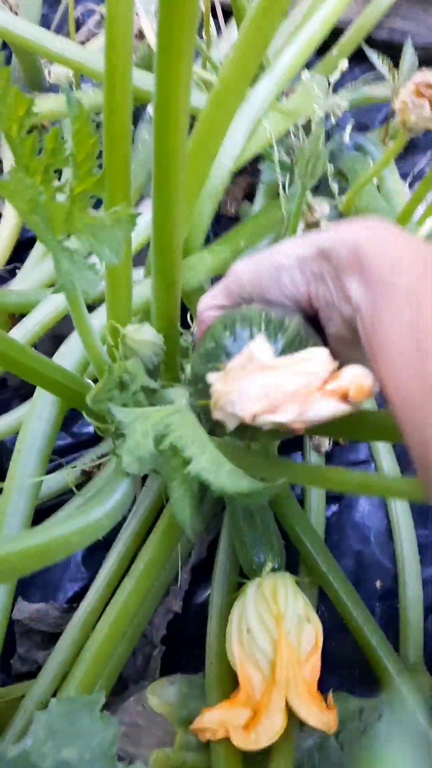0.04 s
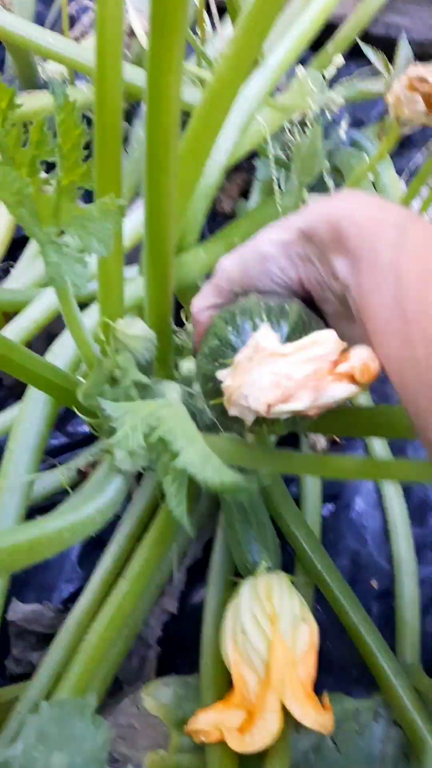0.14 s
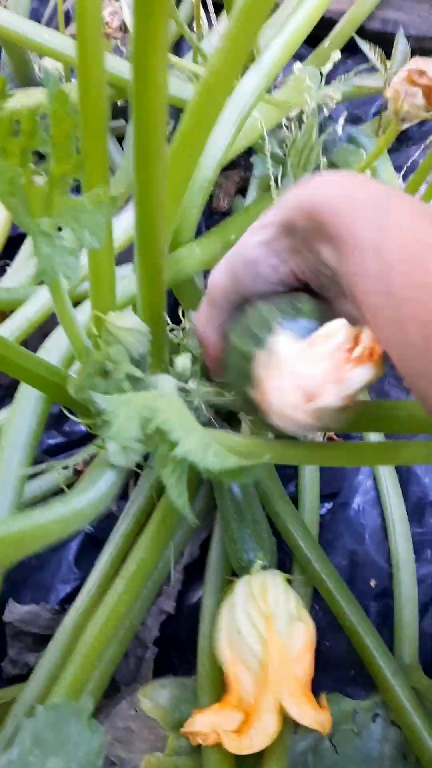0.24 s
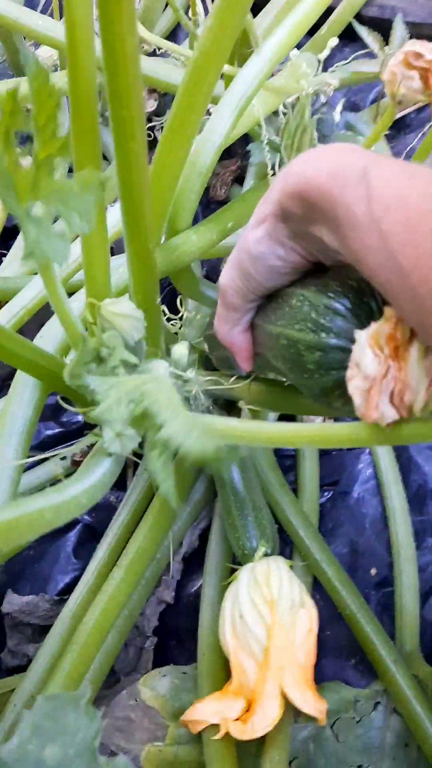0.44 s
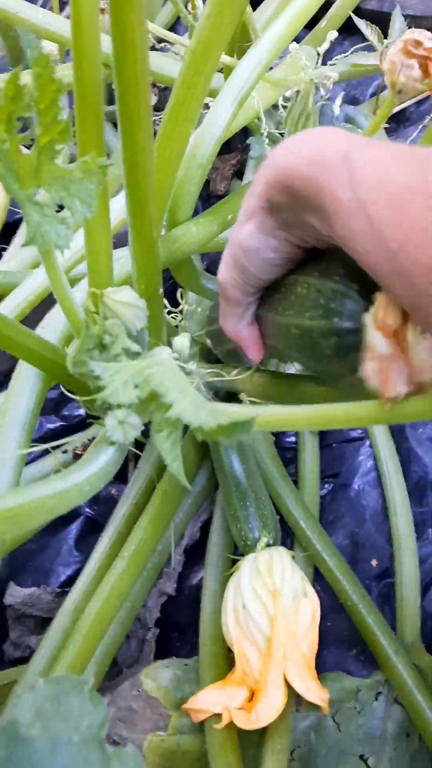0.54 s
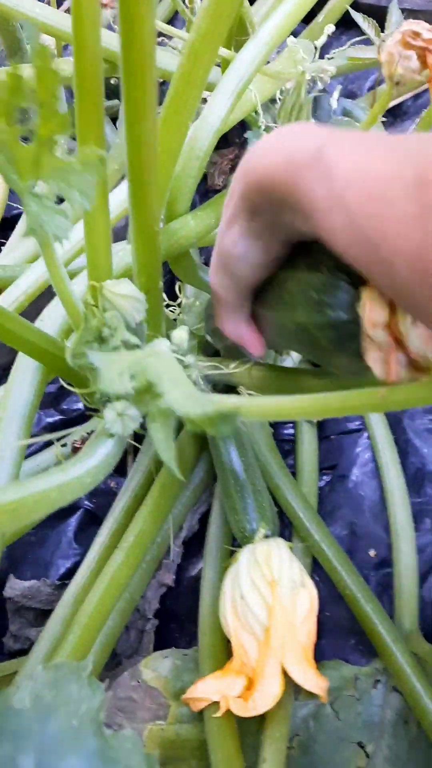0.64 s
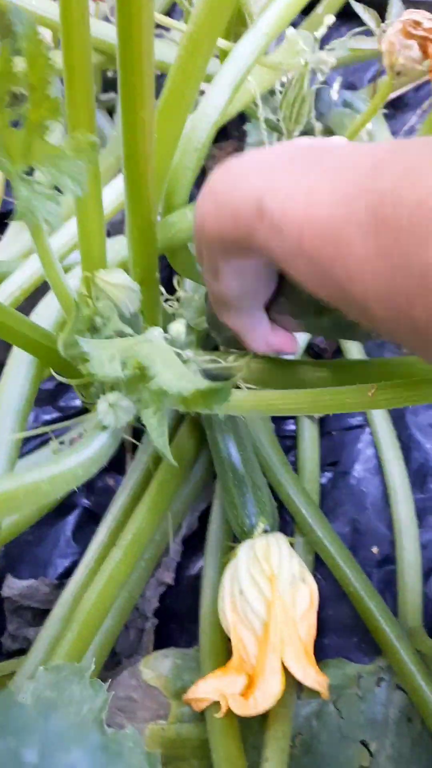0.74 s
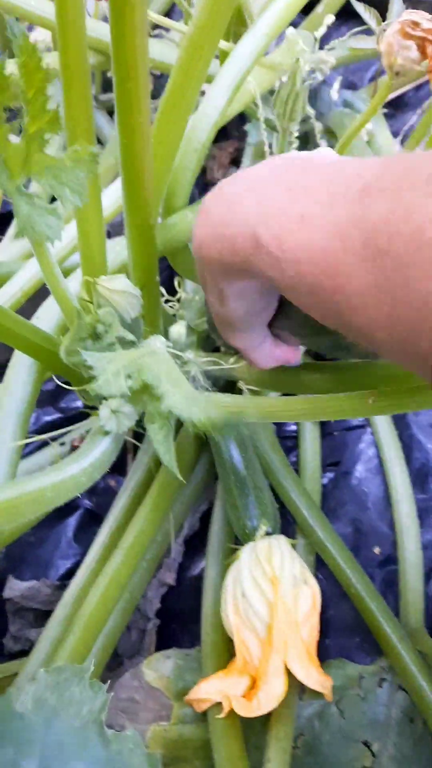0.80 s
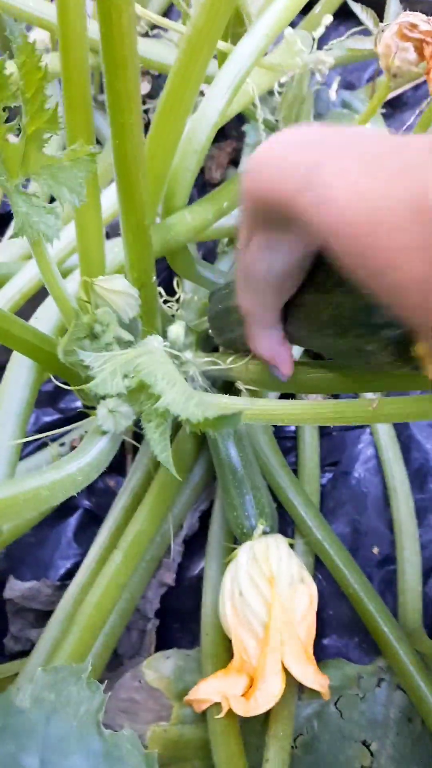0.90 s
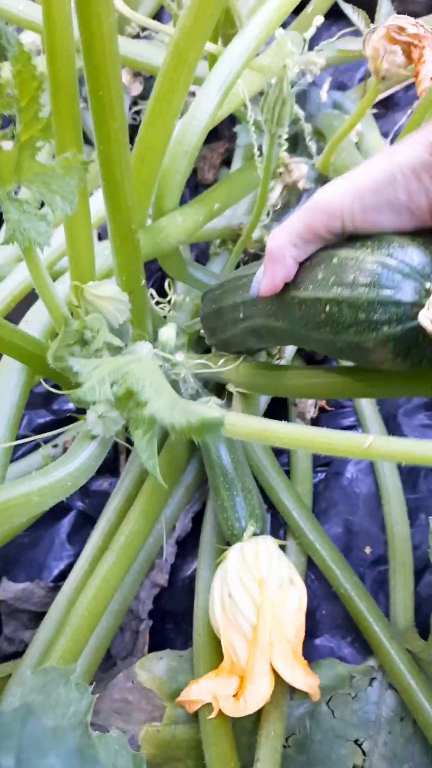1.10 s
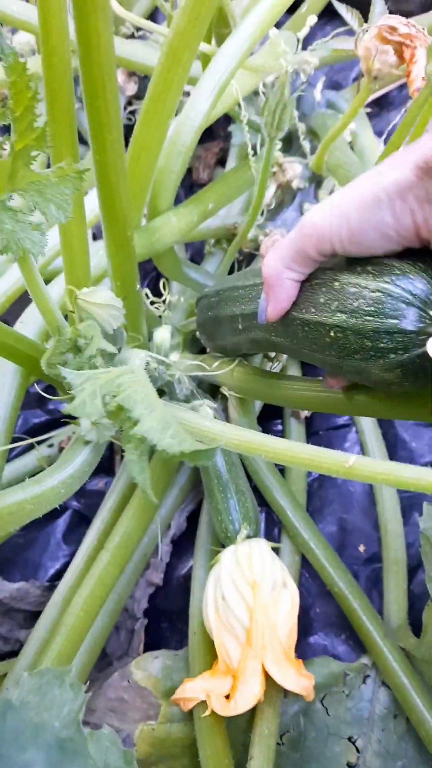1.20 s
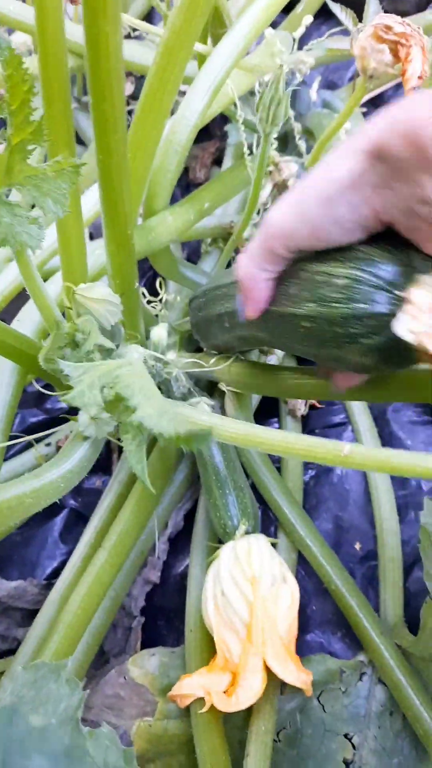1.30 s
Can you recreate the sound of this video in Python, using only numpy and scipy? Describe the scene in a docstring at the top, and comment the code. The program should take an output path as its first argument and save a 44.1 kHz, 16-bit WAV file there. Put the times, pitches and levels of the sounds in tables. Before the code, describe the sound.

A courgette stalk snaps with a juicy crack, creaks in jerks, then squeaks and slows into clicks as it is twisted off; bristly leaves rustle and tick around it, close microphone, quiet greenhouse.

```python
"""A courgette is twisted off its plant by hand, close up, in a greenhouse.
First, bristly leaves tick and rustle by random friction, the fruit is softly bumped and the plant rumbles.
At 0.22 s fibres tear as noise bursts; the juicy stalk snaps, then creaks in stick-slip jerks whose force
pulses excite the modes of the firm fruit. From 0.63 s a long twist squeaks and slows into single slips.
Leaves go on flicking and sliding, and a few faint slips come last, over still air and a short room tail."""
import sys
import numpy as np
from scipy import signal
from scipy.fft import rfft, irfft, next_fast_len
from scipy.io import wavfile

SR = 44100
rng = np.random.default_rng(int(sys.argv[2]) if len(sys.argv) > 2 else 0)


def to_wav(s):
    """Save 16-bit WAV."""
    ch = np.atleast_2d(s).T  # columns
    pcm = np.round(np.clip(ch, -1, 1) * 32767)  # PCM
    wavfile.write(sys.argv[1], SR, pcm.astype(np.int16))


N = 59535
TIME = np.arange(N) / SR

# strength of the leaves brushing the hand: time_s, level_db
BRUSH_LEVEL = [(0, -55), (.07, -61.5), (.15, -54.5), (.21, -53.5), (.25, -41), (.31, -45.5), (.37, -53),
               (.46, -61), (.54, -45.5), (.61, -69.5), (.72, -53), (.82, -61.5), (.95, -62.5),
               (1.07, -62.5), (1.13, -55), (1.20, -54.5), (1.25, -61), (1.35, -57)]
# spectrum of leaf friction and flicks: frequency_hz, gain_db
LEAF_SPECTRUM = [(300, -2.5), (1000, 0), (1300, 0.5), (1750, -1.5), (2300, -1.5), (3000, 1), (4500, 0),
                 (6000, 0), (7800, -1.5), (9300, -6.5), (12000, 0.5), (16000, -3.5)]
LEAF_PLACE = (5.2, 0.067)  # every place: left minus right in dB, left-right likeness


def from_db(db):
    """Amplitude ratio: 20 dB is a factor of ten."""
    return 10 ** (np.asarray(db) / 20)


def rms_one(x):
    """Normalisation to a root mean square of 1."""
    return x / np.sqrt(np.mean(x ** 2) + 1e-20)


def level(curve):
    """Amplitude envelope: gain over time, interpolated in dB between (time_s, level_db) points."""
    return from_db(np.interp(TIME, *np.transpose(curve)))


def pan(db):
    """Level difference between the ears at constant power: left and right gains."""
    return rms_one(from_db([[db / 2], [-db / 2]]))


def delayed(x, delay_s):
    """Propagation delay of a mono signal."""
    return np.interp(TIME - delay_s, TIME, x, left=0)


def noise(place):
    """Partial coherence: white stereo noise mixed from independent mid and side parts."""
    balance_db, likeness = place
    mid, side = rng.standard_normal((2, N))
    shared = np.sqrt(1 + likeness) * mid
    opposed = np.sqrt(1 - likeness) * side * [[1], [-1]]
    return pan(balance_db) * rms_one(shared + opposed)


def colour(x, points):
    """Minimum-phase filtering through (frequency_hz, gain_db) points; white noise keeps its level."""
    size = 2 * next_fast_len(N)
    hz, db = np.transpose(points)
    bin_hz = np.arange(size // 2 + 1) * SR / size
    gain = rms_one(from_db(np.interp(np.log(bin_hz + 1), np.log(hz), db)))
    # folding the cepstrum onto positive times makes the filter causal
    cepstrum = irfft(np.log(gain))[:size // 2]
    cepstrum[1:] *= 2
    response = np.exp(rfft(cepstrum, size))
    return irfft(rfft(x, size) * response)[..., :N]


def dull(x, cutoff_hz):
    """First-order low-pass: the treble falls gently."""
    return signal.sosfilt(signal.butter(1, cutoff_hz, fs=SR, output="sos"), x)


def ring(x, hz, t60_s):
    """Modal resonance: a damped two-pole mode, which a unit click rings at a height of about 1."""
    radius = from_db(-60 / (t60_s * SR))  # decay per sample
    poles = [1, -2 * radius * np.cos(2 * np.pi * hz / SR), radius * radius]
    return signal.lfilter([.5, 0, -.5], poles, x + 1e-18)


def burst(start_s, rise_s, fall_s):
    """Transient envelope: a straight attack and an exponential release."""
    age = TIME - start_s
    return np.clip(age / rise_s, 0, 1) * np.exp(-np.maximum(age - rise_s, 0) / fall_s)


def push(middle_s, contact_s):
    """Contact force: a smooth pulse of unit area; longer contacts sound duller."""
    phase = np.clip((TIME - middle_s) / contact_s, -.5, .5)
    pulse = np.cos(np.pi * phase) ** 2
    return pulse / (pulse.sum() + 1e-9)


def still_air():
    """Stationary noise: a faint coloured background."""
    # spectrum of the air: frequency_hz, gain_db
    air_spectrum = [(22, -22), (55, 3), (140, -11), (240, -14), (335, -11), (600, -17), (1100, -9),
                    (1700, -20), (3000, -7), (9500, -15), (13000, -11), (16000, -11)]
    return from_db(-73) * colour(noise((2.4, 0.13)), air_spectrum)


def plant_shake():
    """Amplitude-modulated noise: the shaken plant rumbles in low-frequency swells."""
    # strength of the shaking: time_s, level_db
    shake_level = [(0, -51), (.07, -69), (.15, -56), (.21, -74), (.24, -39.5), (.315, -44.5), (.39, -65),
                   (.475, -72.5), (.535, -45.5), (.60, -67), (.64, -54), (.69, -57), (.745, -45),
                   (.785, -52), (.83, -71.5), (1.0, -72.5), (1.08, -75), (1.2, -63), (1.26, -71),
                   (1.35, -76)]
    # spectrum of the rumble: frequency_hz, gain_db
    rumble_spectrum = [(22, -27), (33, -15), (50, 6.5), (70, -2.5), (105, -0.5), (180, -1.5), (240, -6.5),
                       (340, 3), (600, -17), (1500, -44.5), (6000, -77)]
    return level(shake_level) * colour(noise((0, 0.26)), rumble_spectrum)


def rustle():
    """Random friction: bristles catch as decaying grains over a soft sliding hiss."""
    grains_per_s, spread_db, fall_s, hiss_db = 1100, 4, 0.0012, -7.5
    strengths = from_db(spread_db * np.minimum(rng.exponential(1, N), 4))
    catches = strengths * (rng.random(N) < grains_per_s / SR)
    decay = np.exp(-1 / (fall_s * SR))
    grains = rms_one(signal.lfilter([1], [1, -decay], catches + 1e-18))
    envelope = level(BRUSH_LEVEL) * rms_one(grains + from_db(hiss_db))
    return colour(envelope * noise(LEAF_PLACE), LEAF_SPECTRUM)


def leaf_slides():
    """Sliding friction: a broad leaf along the arm gives soft, dull swells of noise."""
    # the slides: middle_s, half_length_s, level_db
    slides = [(0.003, 0.042, -60.5), (.15, 0.028, -66), (0.32, 0.022, -56), (1.13, 0.043, -57),
              (1.213, .022, -57.5), (1.294, 0.044, -59)]
    # spectrum of the sliding leaf: frequency_hz, gain_db
    slide_spectrum = [(120, -5), (250, -12), (400, 8.5), (640, -6), (900, -1), (1400, -3), (2100, -3.5),
                      (3000, -11), (6000, -22), (16000, -43)]
    envelope = sum(from_db(db) * np.exp(-((TIME - s) / half) ** 2) for s, half, db in slides)
    return envelope * colour(noise((6, 0.38)), slide_spectrum)


def leaf_ticks():
    """Impulsive excitation: each flick of a bristle or leaf edge is a dry tick with a brief ring."""
    # the flicks: start_s, tick_db, ring_db, pitch_hz
    flicks = [(.001, -48, -54.5, 960), (0.024, -44.5, -73, 2850), (0.085, -51, -67, 4120),
              (0.1292, -47, -49.5, 1640), (0.349, -44, -68, 3460), (.906, -52, -46, 2900),
              (0.984, -74, -55, 3000), (1.089, -56, -51, 3100), (1.120, -61, -45.5, 2830),
              (1.143, -50, -58, 3130), (1.167, -45, -51.5, 3270), (1.1882, -39, -50, 950),
              (1.272, -52, -55, 2940)]
    rise_s, fall_s, t60_s = 0.00065, 0.0034, 0.011
    out, grit = 0, noise(LEAF_PLACE)
    for start_s, tick_db, ring_db, hz in flicks:
        tick = burst(start_s, rise_s, fall_s) * grit
        tone = tick.std() * rms_one(ring(tick, hz, t60_s))
        out = out + from_db(tick_db) * tick + from_db(ring_db) * tone
    return colour(out, LEAF_SPECTRUM)


def fruit(force):
    """Modal synthesis: a force rings the modes of the firm fruit; the ground returns a dull echo."""
    # modes of fruit and stalk: frequency_hz, level_db, t60_s
    modes = [(114, -26, 0.3), (180.8, -20.5, .09), (261, -24, 0.029), (299.4, -19.5, 0.086),
             (358.3, -6.5, 0.067), (394.6, -6.5, 0.036), (481, -9.5, 0.028), (516.7, -10.5, 0.059),
             (610, -16, 0.0059), (683, -23, 0.046), (730, -41, 0.051), (972, -7.5, 0.023),
             (1280, -12, 0.011), (1680, -6, 0.0061)]
    echo_s, echo_db, echo_cutoff_hz = 0.005974, -9, 1300
    knock = sum(from_db(db) * ring(force, hz, t60_s) for hz, db, t60_s in modes)
    knock = knock + from_db(echo_db) * dull(delayed(knock, echo_s), echo_cutoff_hz)
    # the left ear hears it weaker and later
    return pan(-2.7) * np.array([delayed(knock, 0.00027), knock])


def handling():
    """Forced vibration: soft bumps against stems and rubbing leaves also sound the fruit."""
    # the bumps: middle_s, level_db
    bumps = [(.001, -47), (.909, -48), (.987, -48.5), (1.087, -45), (1.275, -49)]
    contact_s, rub_db = 0.0025, -35.5  # rub relative to the brushing
    bumping = sum(from_db(db) * push(s, contact_s) for s, db in bumps)
    rubbing = from_db(rub_db) * level(BRUSH_LEVEL) * rng.standard_normal(N)
    return fruit(bumping + rubbing)


def greenhouse(x):
    """Diffuse reverberation: a faint, short tail of decaying noise, different in each ear."""
    tail_db, t60_s, cutoff_hz, delay_s = -16, 0.13, 3800, 0.0024
    envelope = burst(delay_s, delay_s, t60_s / np.log(1000))
    tail = dull(rng.standard_normal((2, N)), cutoff_hz) * envelope
    return from_db(tail_db) * signal.fftconvolve(x, rms_one(tail) / np.sqrt(N), axes=1)[:, :N]


def tears():
    """Fracture noise: fibres and bristles tear in crisp bursts; finer ones have a higher lower edge."""
    # the tears: start_s, level_db, fall_s, lower_edge_hz
    breaks = [(0.2208, -17, 0.0031, 1100), (0.2225, -26.5, 0.0071, 1000), (0.233, -32.5, 0.0046, 2220),
              (.2405, -40, 0.0019, 2480), (0.272, -37.5, 0.0059, 5000), (0.2988, -32, 0.0021, 3500),
              (0.442, -41.5, 0.004, 5000), (.4890, -38, .002, 699), (.5430, -34.5, 0.00057, 3000),
              (.7750, -39, 0.0037, 900), (.8490, -47, 0.0035, 5000), (0.8842, -46.5, 0.0037, 4500),
              (1.0349, -48, 0.0031, 5000)]
    # spectrum of tearing: frequency_hz, gain_db
    tear_spectrum = [(400, -15), (1400, 6.5), (2200, -5.5), (3300, -4), (5000, -11.5), (6400, -10.5),
                     (7800, 2.5), (9200, -3), (10800, 0.5), (13200, 6), (14200, 3), (16000, -7.5)]
    rise_s = 0.00023
    out, grit = 0, noise((9.1, 0.071))
    for start_s, db, fall_s, edge_hz in breaks:
        high_pass = signal.butter(2, edge_hz, "high", fs=SR, output="sos")
        tear = from_db(db) * burst(start_s, rise_s, fall_s) * grit
        out = out + signal.sosfilt(high_pass, tear + 1e-18)
    return colour(out, tear_spectrum)


def stalk():
    """Stick-slip: each slip knocks the fruit and crackles the fibres, which rings the hollow stalk."""
    # the single slips: knock_middle_s, knock_db, crack_db, contact_s
    single_slips = [(.2239, -15.5, -30, 0.0016), (.2298, -29, -31.5, 0.0012), (.2324, -29, -33.5, 0.0014),
                    (.2823, -22.5, -29.5, 0.00074), (.2872, -31.5, -58, 0.0011), (.4897, -38, -36, 0.00036),
                    (.5010, -31, -36, 0.00062), (.5122, -29.5, -32, 0.00079), (.5208, -28, -35, 0.00054),
                    (.5405, -25, -31, 0.002), (.5520, -27.5, -37, 0.0013), (.6235, -38.5, -56, 0.0016),
                    (.6284, -40.5, -37, 0.00045), (.6845, -46, -30.5, .0007), (.6975, -26.5, -25, 0.001),
                    (.7020, -25, -30, 0.0005), (.7062, -27, -26.5, .0007), (.7140, -24, -28, 0.00057),
                    (.7225, -23.5, -27.5, 0.00082), (.7368, -27.5, -28.5, 0.00027),
                    (.7603, -34, -58, 0.0027), (.7768, -37, -40, 0.00075), (1.1872, -44, -46, 0.0003),
                    (1.3248, -36.5, -34.5, 0.00025), (1.3440, -34, -32.5, 0.00025)]
    # spectrum of the crackle: frequency_hz, gain_db
    crack_spectrum = [(300, -4), (900, 4.5), (1500, -3.5), (2150, -10.5), (2700, -2.5), (3350, -1.5),
                      (3900, 0), (4700, 2), (6300, -4.5), (7700, -7.5), (9400, -10.5), (12500, -1.5),
                      (16000, -14.5)]
    # modes of the hollow stalk: frequency_hz, level_db, t60_s
    stalk_modes = [(1603, -13.5, 0.016), (3107, -12.5, 0.043), (3300, -7.5, 0.032), (3556, -8.5, 0.017),
                   (4360, -16, 0.019), (5240, -27, 0.03), (7620, -13.5, 0.011)]
    lead_s, rise_s, fall_s = 0.0012, .0006, 0.0019  # the crack starts ahead of the knock
    tail_db, tail_fall_s = -8, .008  # fibres keep crackling after a slip
    crisp_db, weak_cutoff_hz = -32, 3270  # crackle below this level loses its top
    direct_db = 0.5

    slips = list(single_slips) + twist_slips()
    force = sum(from_db(db) * push(s, contact_s) for s, db, _, contact_s in slips)
    power = 0
    for s, _, db, _ in slips:
        crack = burst(s - lead_s, rise_s, fall_s)
        tail = from_db(tail_db) * burst(s - lead_s, rise_s, tail_fall_s)
        power = power + from_db(db) ** 2 * (crack ** 2 + tail ** 2)
    envelope = np.sqrt(power)

    fibres = noise((7.1, 0.1))
    crisp = envelope / (envelope + from_db(crisp_db))
    crackle = envelope * (crisp * fibres + (1 - crisp) * dull(fibres, weak_cutoff_hz))
    direct = from_db(direct_db) * colour(crackle, crack_spectrum)
    tones = sum(from_db(db) * rms_one(ring(crackle, hz, t60_s)) for hz, db, t60_s in stalk_modes)
    return fruit(force) + direct + crackle.std() * tones


def twist_slips():
    """Relaxation oscillation: uneven slips slow down and grow as the stalk gives; rows as in stalk()."""
    # the long twist: time_s, slips_per_s, knock_db, crack_db
    twist = [(.629, 1300, -50, -50), (.645, 950, -49.5, -45.5), (.656, 703, -39, -45.5),
             (.666, 520, -34, -40), (0.675, 380, -37, -36.5), (.686, 290, -31, -31.5),
             (0.697, 242, -27.5, -31.5)]
    jitter, spread_db, contact_s = 0.0633, 1.6, 0.00066  # jitter: deviation of the interval's logarithm
    s, rate, knock_db, crack_db = np.transpose(twist)
    rows, now = [], s[0]
    for late, strong in rng.standard_normal((128, 2)):
        if now < s[-1]:
            extra_db = spread_db * strong
            knock = np.interp(now, s, knock_db) + extra_db
            crack = np.interp(now, s, crack_db) + extra_db
            rows.append((now, knock, crack, contact_s))
            now += np.exp(jitter * late) / np.interp(now, s, rate)
    return rows


def scene():
    """Superposition: leaves, fruit and stalk with their room tail, over the shaking plant and still air."""
    plant = rustle() + leaf_slides() + leaf_ticks() + handling() + tears() + stalk()
    return plant + greenhouse(plant) + plant_shake() + still_air()


def record(dry):
    """Band limiting: the deepest bass is rolled off and the top is cut steeply."""
    low_cut_hz, top_cut_hz = 52, 15750
    high_pass = signal.butter(4, low_cut_hz, "high", fs=SR, output="sos")
    low_pass = signal.ellip(10, .1, 80, top_cut_hz, fs=SR, output="sos")  # ripple and stopband in dB
    return signal.sosfilt(low_pass, signal.sosfilt(high_pass, dry))


dry = scene()
out = record(dry)
to_wav(out)
```